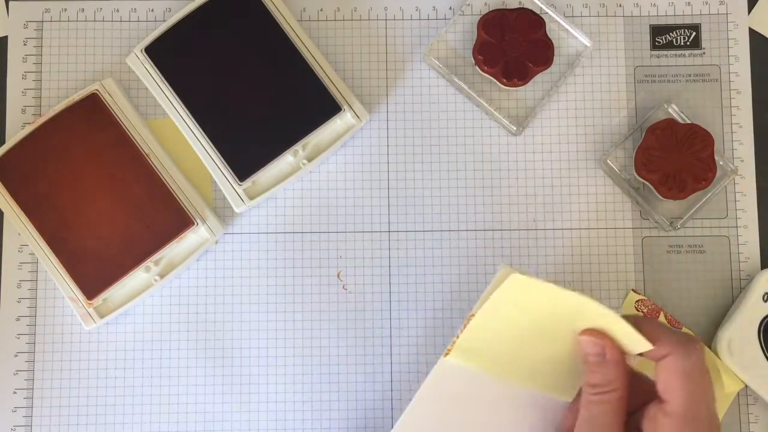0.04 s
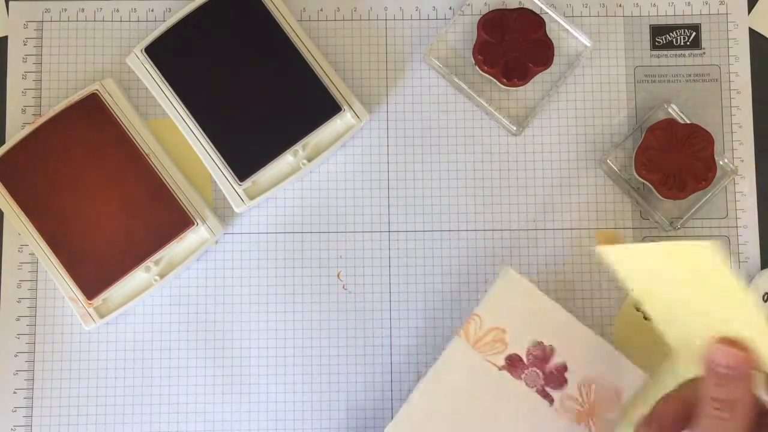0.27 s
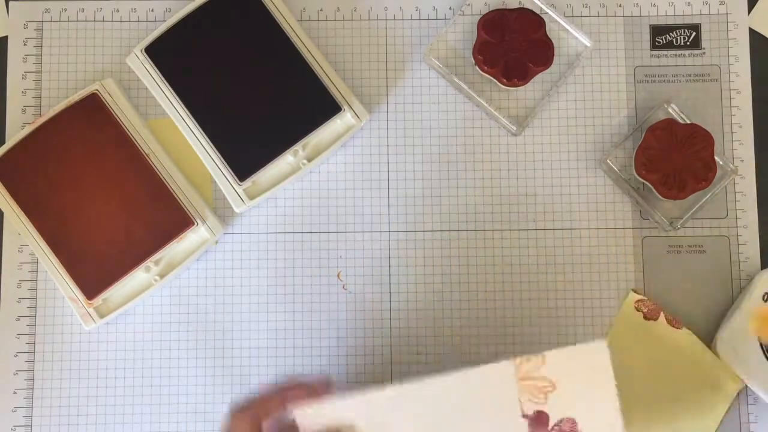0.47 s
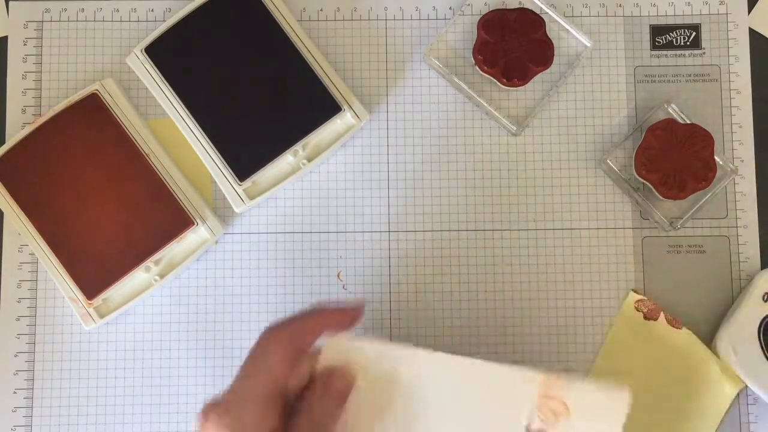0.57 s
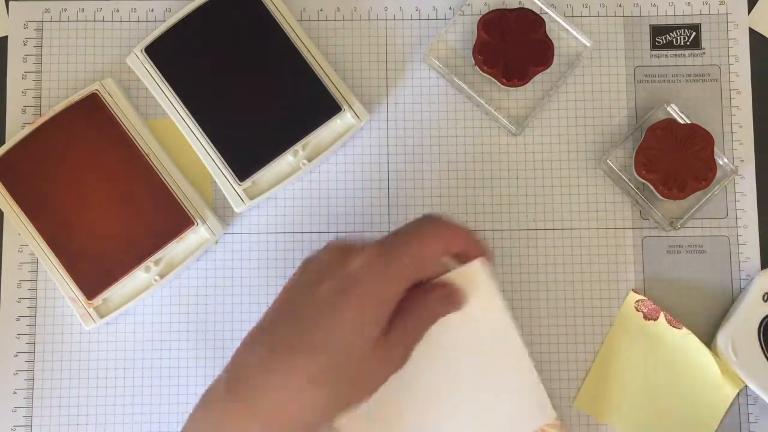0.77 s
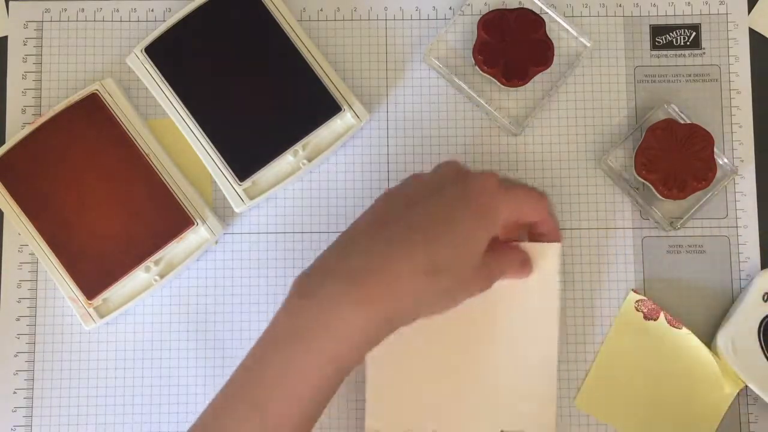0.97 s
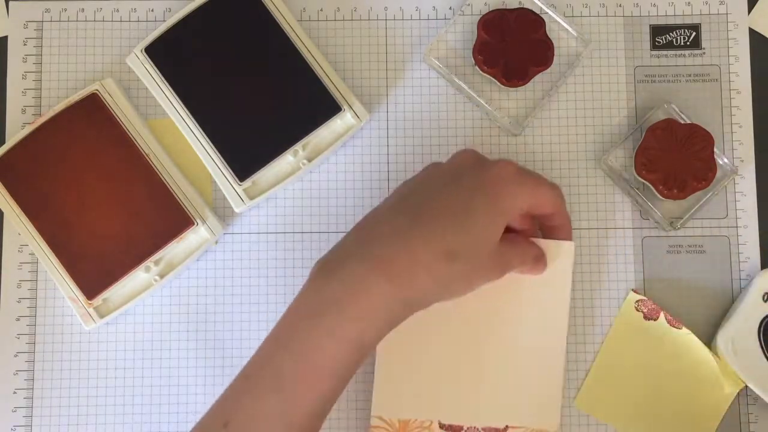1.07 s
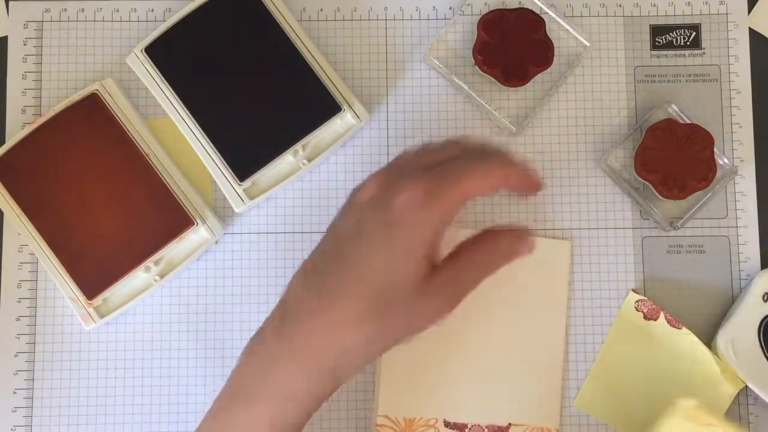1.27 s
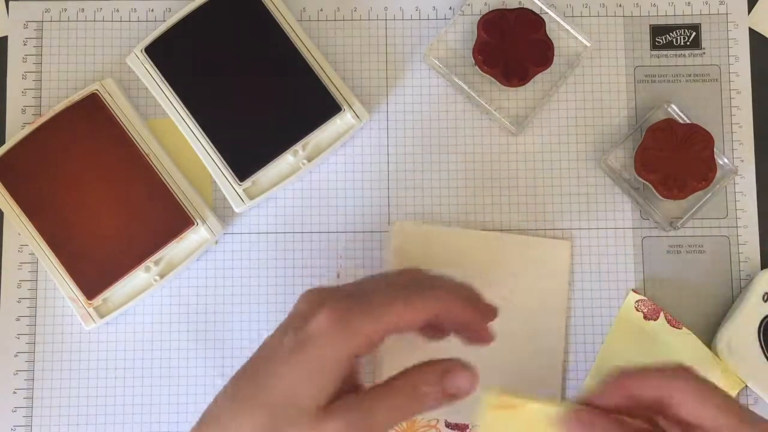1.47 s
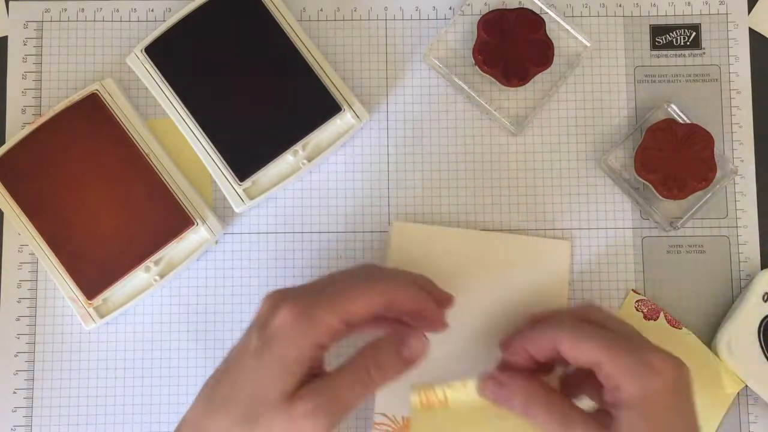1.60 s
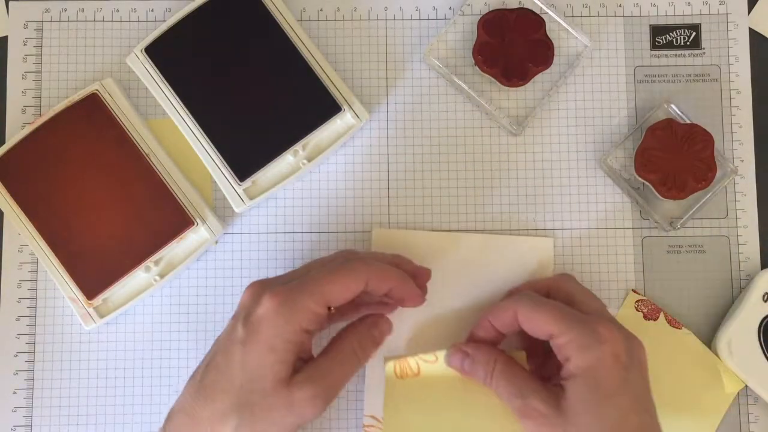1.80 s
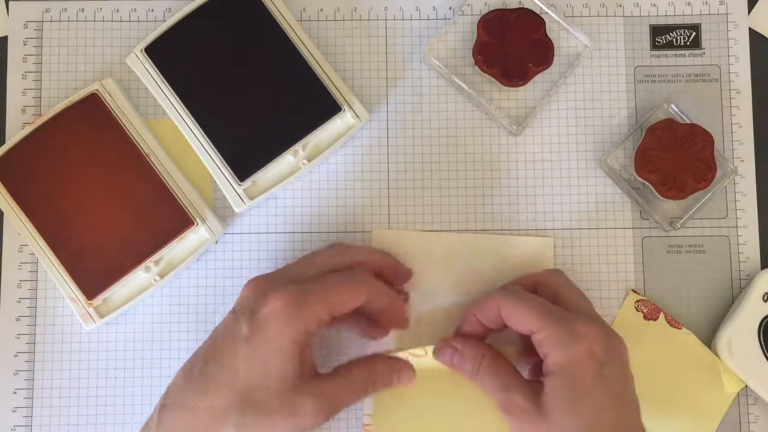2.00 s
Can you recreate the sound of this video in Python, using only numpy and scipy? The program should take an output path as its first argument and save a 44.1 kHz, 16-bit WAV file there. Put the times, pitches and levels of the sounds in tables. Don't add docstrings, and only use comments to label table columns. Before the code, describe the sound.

Paper handling up close: soft rubbing, a crisp sticky peel, a short pause, a second flurry of card clicks and edge scrapes, then very quiet rustles and light touches over a faint room hum.

```python
import sys
import numpy as np
from scipy import signal
from scipy.fft import rfft, irfft
from scipy.io import wavfile

SR = 44100
rng = np.random.default_rng(int(sys.argv[2]) if len(sys.argv) > 2 else 0)


def invert_db(x):
    u = np.asarray(x, float) / 20
    return 10 ** u


def to_wav(sig):
    pcm = np.clip(np.atleast_2d(sig), -1, 1) * 32767
    pcm = np.round(pcm).astype(np.int16)
    wavfile.write(sys.argv[1], SR, pcm.T)


N = 90404

CRACK_Q, CRACK_DB, CRACK_WIDE_DB = 11.4, -16, 9
LEAD = 5


def evened(x):
    return x / np.sqrt(np.mean(x ** 2) + 1e-20)


def add(mix, start_s, sound):
    part = mix[round(start_s * SR):][:len(sound)]
    part += sound[:len(part)]


def resonate(x, hz, width_hz):
    turn = np.exp(2j * np.pi * np.cumsum(hz * np.ones(len(x))) / SR)
    r = np.exp(-np.pi * width_hz / SR)
    return 2 * (turn * signal.lfilter([1 - r], [1, -r], x / turn)).real


def resonate_twice(x, hz, width_hz):
    return resonate(resonate(x, hz, width_hz), hz, width_hz)


def cut(x, hz, kind):
    return signal.sosfilt(signal.butter(2, hz, kind, fs=SR, output="sos"), x)


def cut_twice(x, hz, kind):
    return cut(cut(x, hz, kind), hz, kind)


def colour(x, points):
    f, db = np.transpose(points)
    hz = np.fft.rfftfreq(len(x), 1 / SR)
    gain = invert_db(np.interp(np.log(hz + 1), np.log(f + 1), db))
    return evened(irfft(rfft(x) * gain, len(x)))


def lumpy(x, spread_db, size):
    heights = rng.standard_normal(size + 1)
    hills = np.interp(np.linspace(0, size, len(x) // 2 + 1), np.arange(size + 1), heights)
    return evened(irfft(rfft(x) * invert_db(spread_db * hills), len(x)))


def grit(count, per_s, spread_db, smooth):
    size = invert_db(spread_db * np.minimum(rng.exponential(1, count), 4))
    size = size * (rng.random(count) < per_s / SR)
    clicks = evened(size * rng.choice([-1., 1.], count))
    return evened(clicks + smooth * rng.standard_normal(count))


def snaps(rows, rise, q, gain_db, wide_db, lead):
    out, t = np.zeros(N), np.arange(4096) / SR
    for start_s, db, hz, treble_db, fade_s in rows:
        rise_s = rise * fade_s
        up = np.minimum(t / (rise_s + 1e-4), 1) ** 2
        after = np.maximum(t - rise_s, 0) / fade_s
        quick = up * np.exp(-after ** 2)
        slow = quick + 0.3 * up * np.exp(-after / 2.5)
        clicks = grit(count=4096, per_s=4900, spread_db=2, smooth=0.74)
        clicks = clicks + lead * (np.arange(4096) == round(rise_s * SR))
        clicks = lumpy(clicks, spread_db=4.5, size=70)
        ring = resonate_twice(clicks, hz, hz / q)
        wide = cut_twice(cut_twice(clicks, 1.99 * hz, "low"), 0.57 * hz, "high")
        fizz = cut(clicks, 8600, "high")
        parts = [(ring, slow, 0), (wide, slow, wide_db), (fizz, quick, treble_db + 15.5)]
        for part, envelope, part_db in parts:
            level = invert_db(db + gain_db + part_db) * np.sqrt(np.mean(envelope ** 2))
            add(out, start_s, level * evened(envelope * part))
    return out


def air():
    # [f/Hz, density/dB]
    air_spectrum = [(22, -53), (45, 8), (130, -19.5), (217, -19.5), (344, -13.5), (450, -19), (2110, -19),
                    (16000, -44)]
    # [f/Hz, width/Hz, level/dB]
    hum_bands = [(49.2, 15.8, -62.5), (98, 8.4, -75), (123.6, 9.1, -66.5)]
    hums = sum(invert_db(db) * evened(resonate(rng.standard_normal(N), hz, width)) for hz, width, db in hum_bands)
    return invert_db(-64.5) * colour(rng.standard_normal(N), air_spectrum) + hums


def rubbing():
    # [t/s, length/s, level/dB, f/Hz, ring over hiss/dB]
    strokes = [(.0, 0.067, -53.5, 4230, -9), (0.048, 0.18, -49.5, 2500, -2.5),
               (0.128, 0.039, -51.5, 2570, -5), (0.123, 0.071, -53.5, 3960, 20),
               (0.393, 0.17, -53.5, 6000, -5), (0.575, 0.062, -57, 6200, -21),
               (0.911, 0.053, -54, 4300, -5.5), (1.065, 0.034, -46, 6880, 1.5),
               (1.058, 0.075, -58, 1800, 31), (1.132, 0.16, -54.5, 6000, -14),
               (1.166, 0.058, -56, 1810, 27), (1.187, 0.048, -58, 7200, 16),
               (1.332, 0.047, -53.5, 3340, -3.5), (1.377, 0.14, -56.5, 3500, -16.5),
               (1.514, 0.081, -57, 4040, -18), (1.594, 0.04, -53, 4500, -12),
               (1.656, 0.073, -54, 3170, -3.5), (1.662, 0.06, -45.5, 5570, -19),
               (1.762, 0.094, -59, 1950, 6), (2.016, .06, -67.5, 5000, -24),
               (0.641, 0.042, -48.5, 5430, -15), (1.01, 0.043, -61.5, 1740, 5),
               (0.091, 0.12, -58, 1010, -4.5), (0.815, 0.11, -45.5, 2500, -6)]
    # [t/s, pressure/dB]
    drag = [(0, -51), (.05, -57), (.17, -52), (0.254, -36.5), (.3, -51), (.38, -59), (.52, -61.5),
            (.63, -56.5), (.68, -51), (.73, -41.5), (0.801, -45), (0.894, -39), (.915, -56.5), (.99, -59),
            (1.3, -64), (1.65, -64.5), (1.839, -63.5), (2.05, -72)]
    # [f/Hz, density/dB]
    paper_spectrum = [(120, -57), (200, -48), (373, -11.5), (1040, -3.5), (1250, -8.5), (2510, -5.5),
                      (2910, -4.5), (3900, -6), (16000, -7)]
    # [f/Hz, width/Hz, level/dB]
    table_top = [(1580, 18, 8), (2500, 39, -24), (3910, 144, -3), (6630, 210, -2), (8370, 64, 4.5),
                 (9300, 51, -33)]
    drag_db, table_db = -2, -1
    ring_q, skew, skin_hz = 10, 0.71, 1950

    raw = grit(count=N, per_s=3000, spread_db=-2, smooth=1)
    hiss = colour(raw, paper_spectrum)
    reflected = sum(invert_db(db) * resonate(hiss, hz, width) for hz, width, db in table_top)
    hiss = evened(hiss + invert_db(table_db) * reflected)
    at_s, pressure_db = np.transpose(drag)
    out = invert_db(np.interp(np.arange(N) / SR, at_s, pressure_db) + drag_db) * hiss

    skin = cut_twice(hiss, skin_hz, "high")
    wobble = invert_db(1.86 * evened(cut(rng.standard_normal(N), 69.0, "low")))
    for start_s, length_s, level_db, hz, ring_db in strokes:
        u = np.arange(0, 1, 1 / (length_s * SR))
        k = rng.integers(0, N // 2)
        drift_hz = hz * wobble[-k - len(u) - 1:-k - 1] ** 0.13
        ring = resonate_twice(raw[k:k + len(u)], drift_hz, hz / ring_q)
        rub = lumpy(skin[k:k + 2 * len(u)], spread_db=5, size=80)[:len(u)]
        sound = evened(rub + invert_db(ring_db) * evened(ring))
        swell = np.sin(np.pi * u ** skew) ** 0.92
        add(out, start_s, invert_db(level_db) * swell * sound * wobble[k:k + len(u)])
    return out


def bumps():
    # [t/s, level/dB, f/Hz, length/s]
    pushes = [(0.201, -58, 286, 0.06), (0.267, -52, 186, 0.072), (.32, -57.5, 243, 0.04),
              (0.415, -77, 50, 0.062), (0.709, -73, 120, 0.035), (0.775, -55.5, 363, 0.04),
              (0.801, -56.5, 52, 0.12), (0.868, -56.5, 105, 0.065), (1.229, -65, 322, 0.038),
              (1.671, -65, 52, .1), (1.7, -68.5, 119, 0.086)]
    out = np.zeros(N)
    for start_s, db, hz, length_s in pushes:
        u = np.arange(0, 1, 1 / (length_s * SR))
        push = resonate(rng.standard_normal(8192), hz, hz / 3)[-len(u):]
        add(out, start_s, invert_db(db) * evened(np.sin(np.pi * u ** 0.41) * push))
    return out


def flexes():
    # [t/s, peak/dB, f/Hz, treble/dB, fade/s]
    pops = [(.2035, -31.5, 1910, -24, 0.0033), (.205, -34, 930, -21, 0.0054),
            (.267, -25.5, 990, -22, 0.0063), (.305, -45.5, 2360, -39, 0.03),
            (.321, -30.5, 1410, -32, 0.0029), (.333, -30, 1030, -41, 0.0057),
            (.312, -39.5, 1120, -30, .005), (.339, -39.5, 2280, -36, 0.0027), (.592, -53, 2500, -11, 0.013),
            (.652, -42.5, 592, -32, 0.012), (.659, -39, 1036, -36, 0.0062), (.663, -30, 3180, -38, 0.003),
            (.672, -31, 2500, -25, 0.0015), (.739, -44.5, 420, -22.5, 0.016),
            (.763, -33, 2600, -38, 0.0066), (.84, -42, 364, -19, 0.02), (.927, -60, 900, -14, 0.0031),
            (1.258, -46, 2600, -6.5, 0.0017), (1.759, -47, 2090, -41, 0.0037)]
    return snaps(pops, rise=0.36, q=4.05, gain_db=-8.5, wide_db=-1.5, lead=0)


def rings():
    # [t/s, peak/dB, f/Hz, fade/s]
    patches = [(0.2049, -26.5, 2430, 0.0023), (.268, -42.5, 487.5, 0.012), (.270, -35, 1384, 0.0087),
               (.282, -27, 2362, 0.0033), (0.601, -46.5, 1346, .006), (.662, -37, 797, 0.0086),
               (.661, -37, 1444, 0.0035), (.738, -38, 2310, 0.0025), (.740, -47.5, 835, 0.0095),
               (0.7852, -31.5, 2500, 0.0029), (.785, -47.5, 792, .006), (.786, -65, 404, 0.0035),
               (0.8204, -26, 3850, .0015), (.824, -27.5, 3810, 0.0019), (.8275, -24, 3690, 0.0014),
               (.823, -42, 2500, .005), (.8415, -23, 2456, 0.002), (.842, -26.5, 6450, 0.0012),
               (.843, -37.5, 1580, 0.0063), (.843, -39, 977, 0.0037), (.852, -47, 2500, .003),
               (.868, -29.5, 6000, 0.00073), (.870, -47, 1530, 0.01), (.862, -47.5, 797, 0.014),
               (.927, -45.5, 952, 0.0047), (1.241, -49.5, 1680, 0.0084), (1.2575, -48, 3110, 0.0025),
               (1.259, -50, 2500, 0.0029), (1.259, -39.5, 985, 0.007), (1.266, -56, 3130, 0.002)]
    rise, rough = 0.13, 0.45
    out, t = np.zeros(N), np.arange(4096) / SR
    for start_s, db, hz, fade_s in patches:
        attack = (1 - np.exp(-t / (rise * fade_s))) ** 2
        shape = attack * np.exp(-(t / (1.8 * fade_s)) ** 1.65)
        unsteady = evened(resonate(rng.standard_normal(4096), hz, hz / 6))
        tone = np.sin(2 * np.pi * hz * t) + rough * unsteady
        add(out, start_s, invert_db(db) * shape / shape.max() * tone)
    return out


def cracks():
    # [t/s, peak/dB, f/Hz, treble/dB, fade/s]
    releases = [(.2517, -25, 7140, -4, 0.0013), (.259, -28, 9500, 5, 0.0025),
                (.2615, -19, 3880, -0.5, 0.0088), (.2675, -17, 2800, -5, 0.0023),
                (.274, -27.5, 3380, -6, 0.0064), (.737, -27.5, 2500, -3, 0.0079),
                (.740, -25, 5300, -31, 0.0032), (.750, -31.5, 2720, 8.5, 0.00059),
                (.8205, -24, 4330, -29, 0.0035), (.824, -34, 3900, -38, 0.0045),
                (.8408, -30, 3630, 0, 0.0037), (.868, -26.5, 5900, -5, 0.0022),
                (1.153, -38.5, 6940, -39, 0.003), (1.236, -46, 3300, 2.5, 0.0054)]
    return snaps(releases, rise=0.19, q=CRACK_Q, gain_db=CRACK_DB, wide_db=CRACK_WIDE_DB, lead=LEAD)


def ticks():
    # [t/s, peak/dB, lowest f/Hz, fade/s]
    threads = [(0.2524, -4.5, 3220, .0007), (0.2543, -23, 3000, .003), (0.2612, -6, 2500, 0.00066),
               (0.261, -17, 2200, 0.0032), (0.2673, -9, 2200, 0.0033), (0.2715, -9, 6000, 0.0016),
               (0.27, -24, 1500, 0.0018), (.2825, -23, 2000, .0015), (0.666, -44, 1500, 0.0011),
               (.666, -37, 1200, 0.007), (.7345, -36, 4000, .002), (0.7373, -27, 2000, 0.0035),
               (.7425, -28, 4000, .002), (.7505, -29, 3000, 0.0012), (.766, -35, 5000, .002),
               (0.785, -18, 4000, .002), (0.781, -47, 2500, .003), (.801, -24, 2500, .001),
               (.8142, -24, 3000, 0.0032), (0.827, -14, 6000, 0.0012), (.836, -43, 3000, .002),
               (.8425, -25, 3000, 0.00083), (.8515, -27, 2500, 0.0022), (0.868, -38, 3000, .001),
               (0.894, -27, 3000, 0.00089), (.899, -27, 2500, 0.00092)]
    out, t = np.zeros(N), np.arange(1024) / SR
    for start_s, db, low_hz, fade_s in threads:
        burst = (rng.standard_normal(1024) + LEAD * (t == 0)) * np.exp(-t / fade_s)
        puff = cut_twice(burst, low_hz, "high")
        add(out, start_s, invert_db(db) * puff / abs(puff).max())
    return out


def scrapes():
    # [t/s, peak/dB, f/Hz, treble/dB, fade/s]
    edges = [
        (.279, -18, 3300, -22, 0.0028),
        (.731, -35.5, 5600, 6, 0.0023),
        (.762, -39, 6000, -14, 0.00075),
        (.7815, -23, 3560, -3.5, 0.0047),
        (.894, -32.5, 2780, -9, 0.0035),
    ]
    return snaps(edges, rise=1.2, q=CRACK_Q, gain_db=CRACK_DB, wide_db=CRACK_WIDE_DB, lead=LEAD / 2)


def slide():
    # [t/s, f/Hz, level/dB]
    path = [
        (1.652, 2380, -73),
        (1.662, 2410, -66),
        (1.686, 2450, -55),
        (1.696, 3300, -50),
        (1.704, 3440, -53.5),
        (1.712, 2670, -61),
        (1.724, 2300, -69),
    ]
    width_hz, upper_hz, upper_width_hz, upper_db = 190, 6100, 270, -79
    at_s, hz, db = np.transpose(path)
    t = np.arange(at_s[0], at_s[-1], 1 / SR)
    glide_hz = np.interp(t, at_s, hz)
    low = evened(resonate_twice(rng.standard_normal(len(t)), glide_hz, width_hz))
    high = evened(resonate_twice(rng.standard_normal(len(t)), upper_hz, upper_width_hz))
    out = np.zeros(N)
    add(out, at_s[0], invert_db(np.interp(t, at_s, db)) * low + invert_db(upper_db) * np.hanning(len(t)) * high)
    return out


def room(x):
    level_db, t60_s, top_hz = -14.5, 0.056, 5000
    t = np.arange(SR // 2) / SR
    echoes = rng.choice([-1., 1.], len(t)) * (rng.random(len(t)) < .05)
    tail = cut(echoes * (t > .004) * invert_db(-60 * t / t60_s), top_hz, "low")
    return invert_db(level_db) * signal.fftconvolve(x, tail / np.linalg.norm(tail))[:N]


def scene():
    paper = rubbing() + flexes() + rings() + cracks() + ticks() + scrapes() + slide()
    return (paper + room(paper) + bumps() + air())[None]


def low_pass(x):
    return signal.sosfilt(signal.butter(12, 16820, fs=SR, output="sos"), x)


def record(dry):
    # [f/Hz, gain/dB]
    mic = [(0, -1), (1500, -2.5), (2000, -4.5), (2400, -1.5), (9500, -2), (10500, -7), (11500, -2.5),
           (15300, -8)]
    edge_hz = 15850
    hz, db = np.transpose(mic)
    corners_hz = [*hz, edge_hz - 100, edge_hz + 50, SR / 2]
    taps = signal.firwin2(511, corners_hz, [*invert_db(db), invert_db(db[-1]), .006, 0], fs=SR)
    mix = signal.oaconvolve(cut(dry, 59.3, "high"), taps[None], "same")
    return low_pass(mix)


dry = scene()
out = record(dry)
to_wav(out)
```